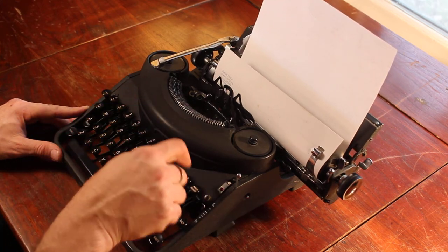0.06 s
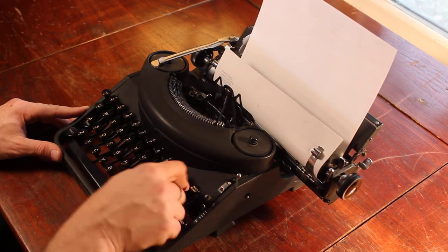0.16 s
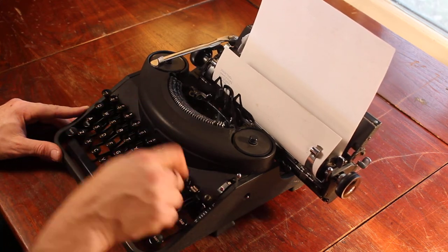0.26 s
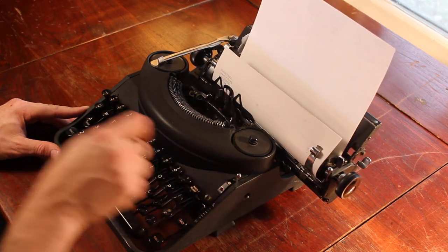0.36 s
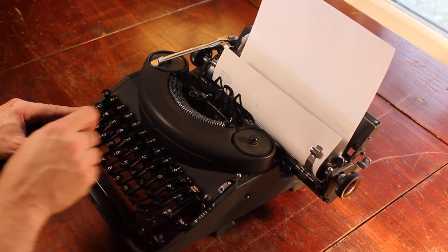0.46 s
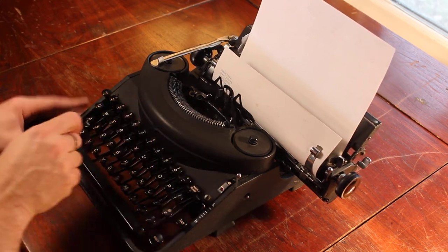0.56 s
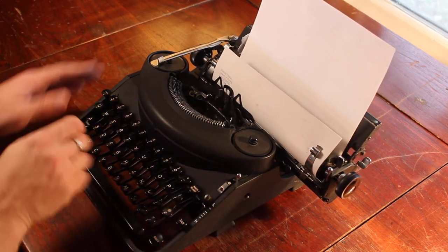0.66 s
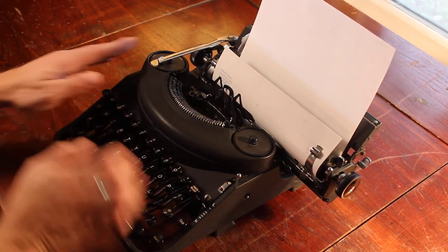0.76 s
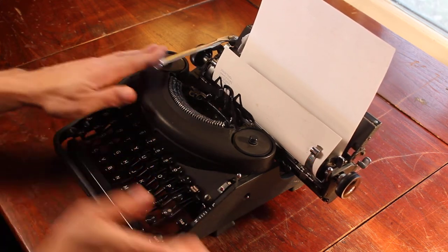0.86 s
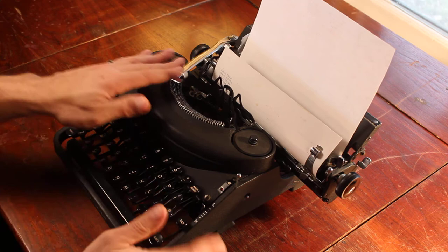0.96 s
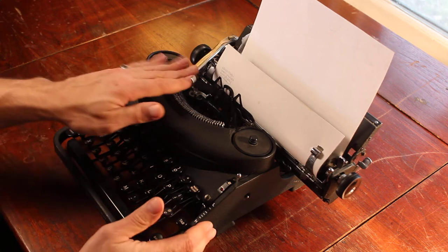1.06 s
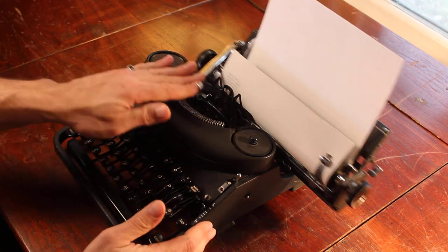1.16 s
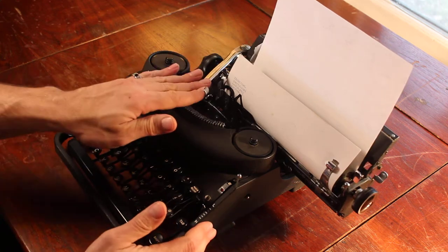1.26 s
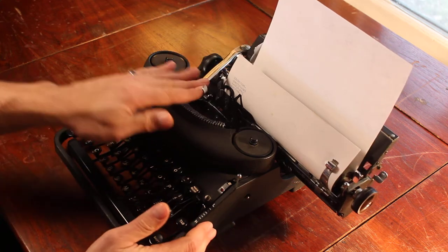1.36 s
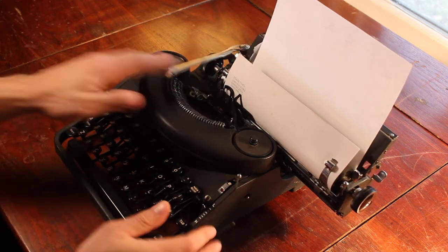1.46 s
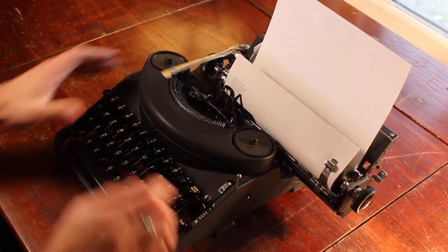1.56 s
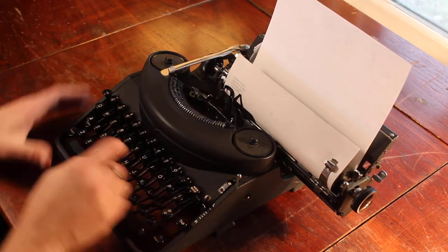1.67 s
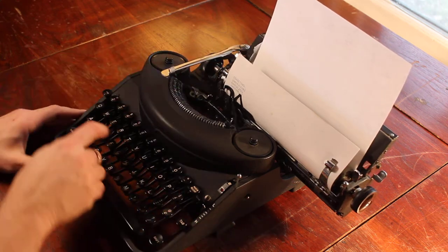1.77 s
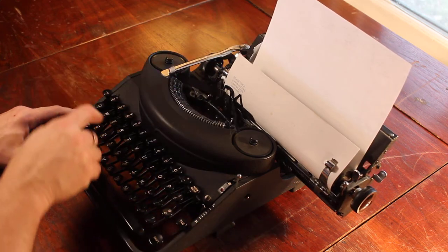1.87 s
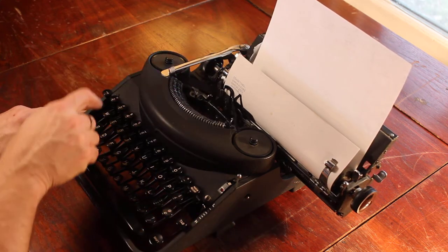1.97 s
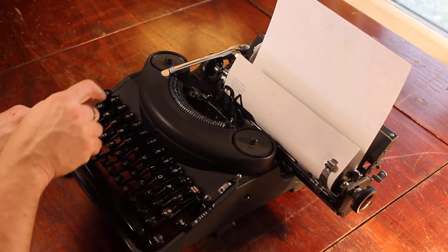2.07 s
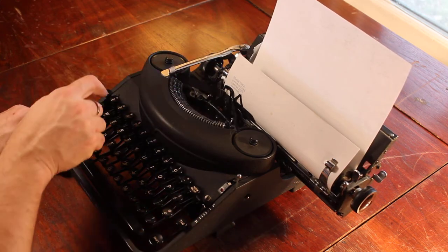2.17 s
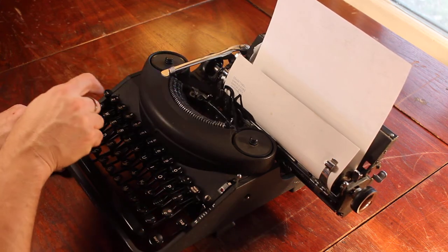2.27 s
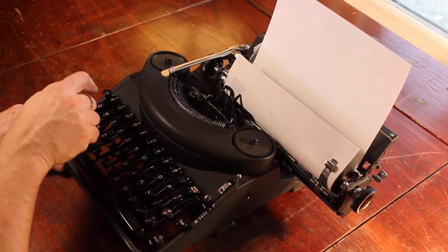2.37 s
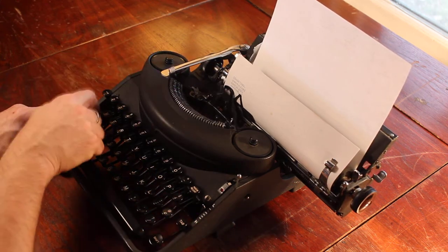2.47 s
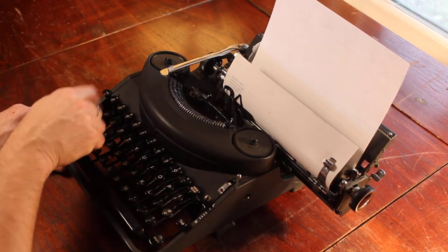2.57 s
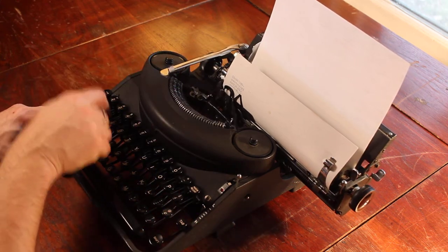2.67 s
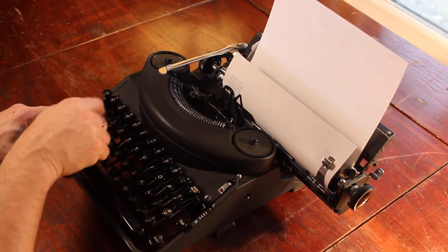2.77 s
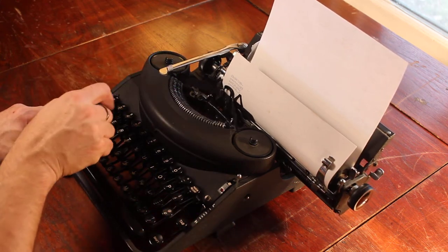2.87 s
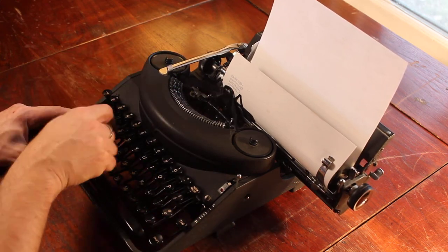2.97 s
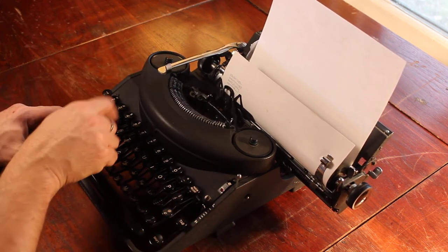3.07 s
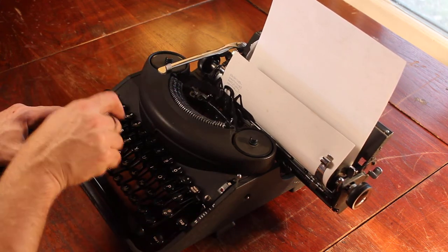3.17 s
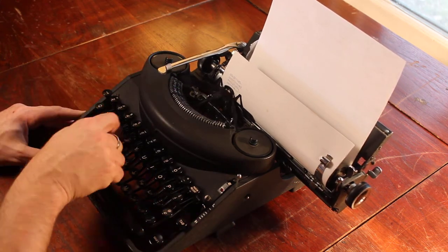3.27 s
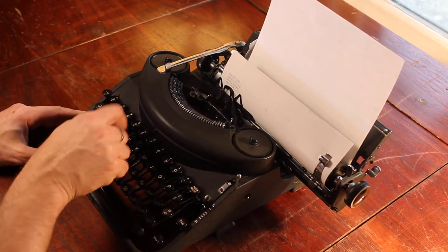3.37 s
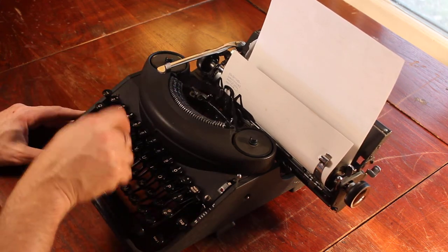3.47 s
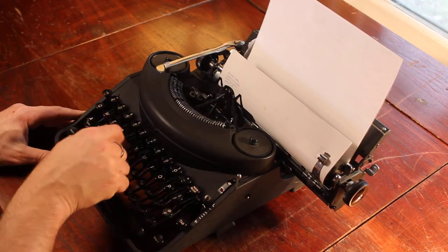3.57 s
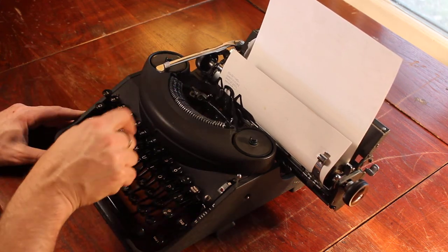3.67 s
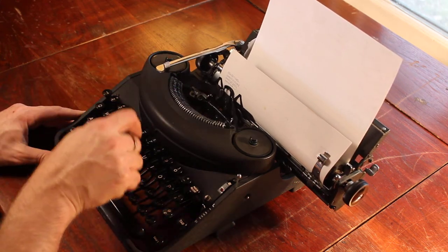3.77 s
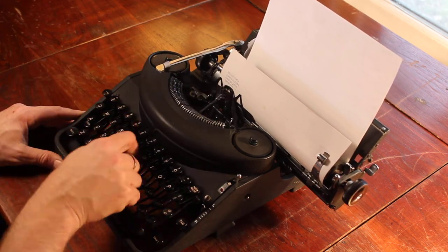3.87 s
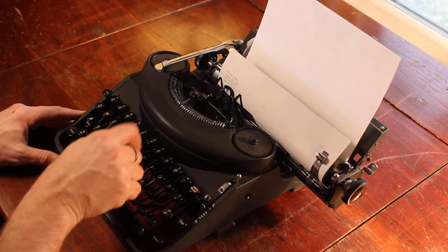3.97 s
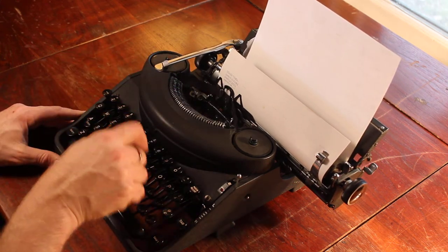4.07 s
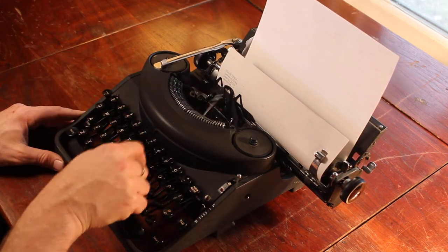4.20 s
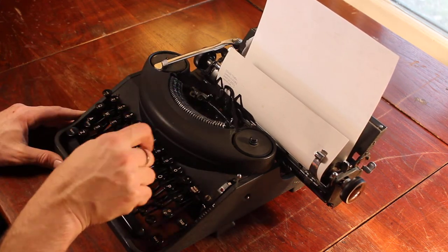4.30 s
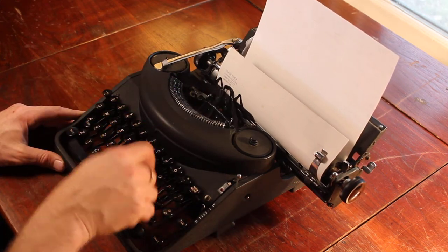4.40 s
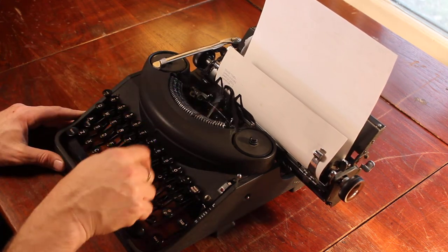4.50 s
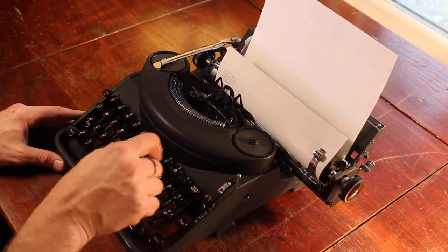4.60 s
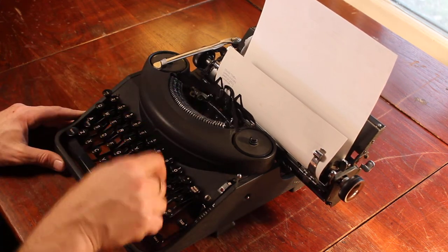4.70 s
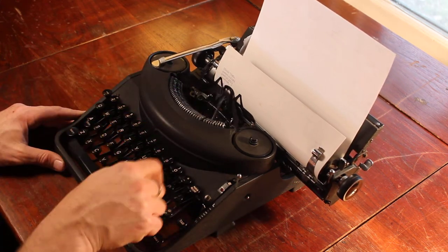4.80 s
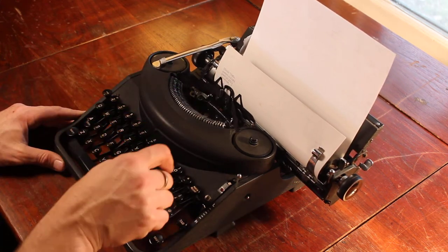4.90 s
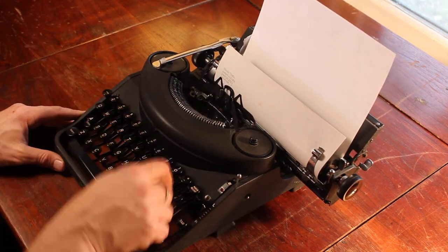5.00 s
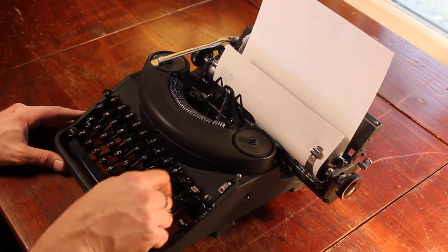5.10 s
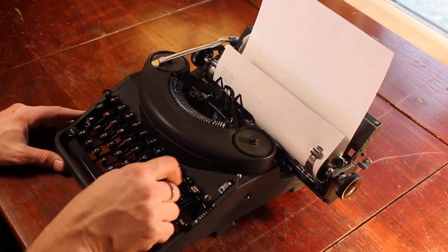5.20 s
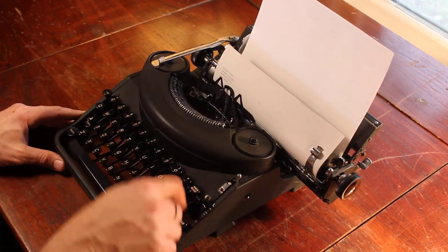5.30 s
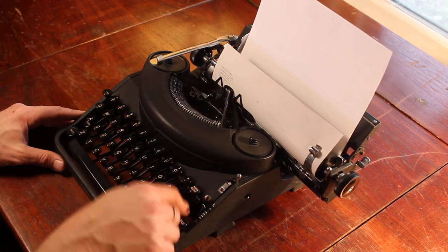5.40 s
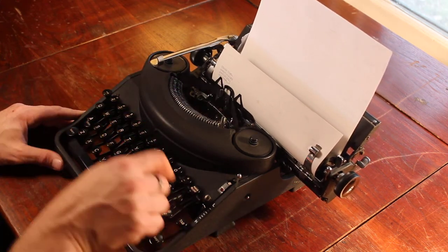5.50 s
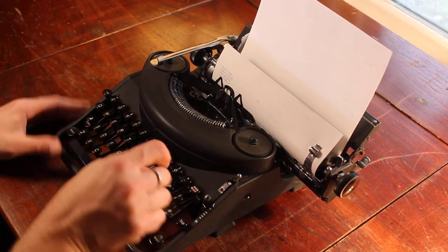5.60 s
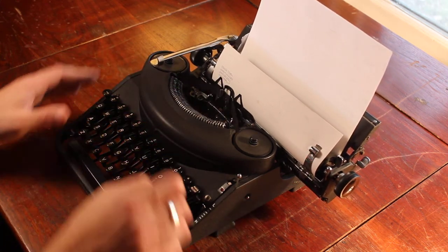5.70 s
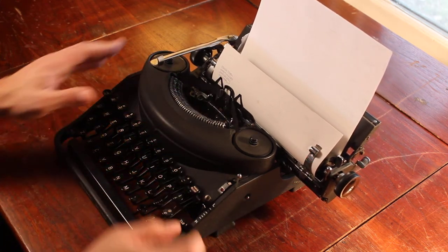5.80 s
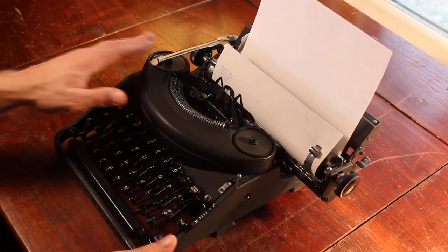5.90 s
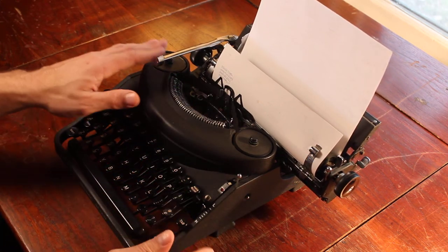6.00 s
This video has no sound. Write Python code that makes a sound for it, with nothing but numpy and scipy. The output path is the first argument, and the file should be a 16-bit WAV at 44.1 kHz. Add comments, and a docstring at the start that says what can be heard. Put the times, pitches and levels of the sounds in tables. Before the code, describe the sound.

Close up, an old manual typewriter clacks once, its carriage zips back to a heavy stop, and slow, even typing follows on a wooden table.

```python
"""In a quiet room, a portable manual typewriter stands on a wooden table, close to a mono microphone.
In each stroke the finger meets the key, the linkage scrapes, the typebar slaps the platen, then parts fall back.
Once the carriage is pushed home over its rack and the lever rattles back. A mains appliance hums far off.
Short noise bursts make the clatter, brief sines the pings, and resonances the ringing frame and table."""
import sys
import numpy as np
from scipy import signal
from scipy.fft import rfft, irfft, next_fast_len
from scipy.io import wavfile
from scipy.ndimage import map_coordinates

SR = 44100
rng = np.random.default_rng(int(sys.argv[2]) if len(sys.argv) > 2 else 0)


def bounce(signal):
    """Save signal as a 16-bit WAV file at the path given by the first command-line argument."""
    frames = np.transpose(np.atleast_2d(signal))
    limited = np.clip(frames, -1, 1)
    pcm = np.round(limited * 32767).astype(np.int16)
    wavfile.write(sys.argv[1], SR, pcm)


N = 266805

# In all tables, t60 is the time a sound takes to fall by 60 dB.
# colour of the room air: (frequency [Hz], relative level [dB])
AIR_COLOUR = [(20, -4.5), (32, -5), (45, -4.5), (65, -10), (90, -14), (200, -15.5), (330, -19.5),
              (430, -27), (600, -31), (1400, -32), (2130, -42.5), (4160, -43), (5000, -47.5), (15900, -51)]
# lines of the distant hum: (frequency [Hz], mean rms level [dB])
HUM_LINES = [(59.6, -57.5), (119.2, -68), (210, -72), (538, -85), (1017, -85), (1378, -86), (1863, -93),
             (3025, -93), (4258, -89)]
# how long the room rings: (frequency [Hz], t60 [s])
ROOM_DECAY = [(150, 0.96), (1000, 0.33), (5000, .28), (14000, 0.32)]
# carriage creeping or sliding on its rails, one list per move: (time [s], scrape level [dB], rumble level [dB])
CARRIAGE_SLIDES = [
    [(0.42, -67, -57), (0.55, -68.5, -60), (0.668, -66, -57), (0.82, -84.5, -74)],
    [(0.86, -80, -70), (0.946, -68, -59.5), (1.04, -61, -52), (1.082, -46.5, -44), (1.138, -50, -46),
     (1.222, -44, -41.5), (1.3, -56, -53)],
    [(1.38, -65.5, -44.5), (1.462, -53.5, -47), (1.558, -52.5, -42.5), (1.724, -66, -52.5),
     (1.85, -76.5, -70)],
    [(5.6, -70, -60), (5.642, -74.5, -66), (5.75, -86, -71)],
]
# noise colour of lever and carriage: (frequency [Hz], relative level [dB])
CHROME_COLOUR = [(180, -32), (300, -5), (453, -13.5), (508, -3), (570, -8), (1140, -6), (1610, -12),
                 (2200, -3), (2820, -10), (4550, -5), (6220, -14.5), (7840, -17.5), (8940, -26),
                 (15400, -33)]
# noise colour of the pawl on the rack: (frequency [Hz], relative level [dB])
PAWL_COLOUR = [(1200, -25.5), (2300, -3), (3200, -11), (4500, 0.5), (6000, -9.5), (8800, -5),
               (10000, -11.5), (13000, -10), (15900, -14)]
# noise colour of the faint ticks: (frequency [Hz], relative level [dB])
TINKLE_COLOUR = [(1200, -36), (2300, -0.5), (3200, -14), (4200, -0.5), (5500, -16.5), (6500, -2),
                 (7400, -12), (8600, -1), (9800, -19), (13500, -16), (15900, -19)]
# noise colour of the key parts: (frequency [Hz], relative level [dB])
STEEL_COLOUR = [(180, -31), (300, -5), (366, -6.5), (397, -9), (431, -8), (651, -6.5), (890, -10),
                (1410, -10.5), (1610, -11), (2200, -7.5), (3610, -12.5), (4550, -8), (5280, -13.5),
                (7000, -16), (8800, -16), (10500, -23), (15400, -24.5)]
# resonances of the steel frame: (frequency [Hz], width [Hz], level [dB])
FRAME_MODES = [(611, 60, -4), (1120, 20, -18), (1387, 136, -2.5), (1910, 27, -16.5), (2130, 32, -15),
               (2840, 27, -22.5), (2940, 110, -9), (4165, 45, 0.5), (4240, 23, -6), (5024, 68, -3),
               (7070, 80, -19.5), (7420, 110, 2.5)]
# frame on table top, closely spaced modes that beat: (frequency [Hz], width [Hz], level [dB])
TABLE_MODES = [(83.2, 30, -19), (116, 8.2, -2.5), (144.2, 9.1, 3), (179, 8, -1), (208.8, 7.2, -8),
               (238.8, 16, -10.5), (245, 10, -24.5), (279, 7.3, -18), (322, 11, -16), (398, 9.9, -12),
               (498, 14, -18.5)]
# low modes of the heavy carriage: (frequency [Hz], relative level [dB], t60 [s])
CARRIAGE_MODES = [(265.6, 7.5, 0.086), (319, -5.5, 0.2), (391, -3.5, 0.21), (498, -7.5, 0.18),
                  (570, -7.5, 0.16), (646.6, -7.5, 0.16), (853, -11, 0.084)]
# single faint ticks: (time [s], level [dB])
FAINT_TICKS = [(0.0674, -45), (0.6274, -63), (0.6436, -60), (4.1044, -50), (4.6696, -52), (4.9629, -49),
               (4.998, -49.5), (5.0213, -46.5), (5.033, -53.5), (5.6064, -52.5), (5.6368, -60),
               (5.6704, -61), (5.9104, -65), (5.9204, -60.5)]
# a spring shivering against its neighbour: (start [s], length [s], first tick level [dB])
SPRING_SHIVERS = [(0.105, 0.036, -46.5), (0.3685, 0.206, -48), (3.197, 0.036, -55.5)]
# carriage lands on the margin stop: (time [s], level [dB])
MARGIN_BLOWS = [(1.257, -13.5)]
# return lever and line feed: (time [s], level [dB], relative treble [dB], ping frequency [Hz])
LEVER_CONTACTS = [(0.894, -40, -15.5, 2450), (0.8998, -34.5, -23, 5000), (0.9962, -23, -10.5, 4300),
                  (1.0554, -39.5, -12.5, 2620), (1.0879, -18, -15.5, 4470), (1.099, -23.5, -20.5, 4100),
                  (1.121, -33.5, -16.5, 4680), (1.2659, -22, -10.5, 4740), (1.2782, -27, -15, 4300),
                  (1.4245, -33, -22, 4630), (1.4339, -32.5, -19.5, 4500), (1.447, -36, -17, 4200),
                  (1.457, -26, -11.5, 4350), (1.4998, -30, -9.5, 4150), (1.506, -24, -12.5, 4620),
                  (1.5204, -34, -13, 4140), (1.546, -33, -13.5, 4400), (1.5646, -28, -13, 4320),
                  (1.5792, -37, -18.5, 4730), (1.6004, -38.5, -20, 4150), (1.6222, -37, -11.5, 2450),
                  (1.6383, -36.5, -25.5, 4540), (1.6882, -38, -14, 4570), (1.729, -47.5, -18, 4750),
                  (1.7535, -58, -22, 2120)]
# loose parts knocking once more: (time [s], level [dB], ping frequency [Hz])
LOOSE_KNOCKS = [(0.0742, -33.5, 2190), (0.3609, -39, 3950), (0.3859, -31, 1840), (0.417, -33, 2070),
                (4.046, -44, 3900), (4.0751, -33, 3170), (4.6325, -33, 1850), (5.2624, -29.5, 1710),
                (5.288, -41.5, 3200), (5.4047, -19.5, 2190), (5.568, -34.5, 2120), (5.582, -36.5, 2140)]
# key let go: (typebar landing time [s], level [dB], relative thud [dB],
# escapement ahead by [ms], key tops out behind by [ms])
KEY_RELEASES = [(0.0034, -22, -2, 14, 24.3), (0.2859, -21, -1, 23.2, 13.3),
                (2.6151, -19.5, -3.5, 58.4, 19.4), (2.8403, -23, -1, 31.7, 10),
                (3.0999, -21.5, 0.5, 22, 18), (3.389, -22, -1.5, 21.6, 18.9),
                (3.6713, -21, -0.5, 19.1, 29.6), (3.988, -22, -5, 24, 16.3),
                (4.2779, -20.5, -2.5, 22.2, 20.1), (4.567, -22.5, -2, 19.6, 20.6),
                (4.877, -20.5, -3, 25.7, 13), (5.182, -22.5, -3, 27.3, 14), (5.4824, -21, -8, 19.6, 21)]
# one keystroke: (slap time [s], slap level [dB], relative thud [dB], typebar ping frequency [Hz],
# relative ping [dB], flight from finger to slap [ms], finger level [dB], key ping frequency [Hz])
KEYSTROKES = [(0.189, -7.5, -8, 5520, -13.5, 28.8, -27, 1970),
              (2.5105, -7.5, -5, 5020, -14, 28.9, -31, 4310),
              (2.7423, -10, -5.5, 5250, -3, 34.4, -30.5, 1730),
              (3.0056, -7, -6.5, 4970, -5.5, 29.6, -28, 3060),
              (3.2952, -6.5, -4.5, 4940, -6, 31.2, -25, 4300),
              (3.5616, -6.5, -9.5, 5500, -4, 30.9, -31, 4530),
              (3.8925, -7, -8, 5080, -1.5, 29.7, -28.5, 4430),
              (4.1766, -7, -6, 5020, -3.5, 29.1, -27, 1770),
              (4.4669, -6.5, -6.5, 5090, -9.5, 32.6, -30, 3260),
              (4.7743, -8, -3.5, 5220, -7, 30.2, -27.5, 3060),
              (5.0828, -8.5, -6, 5050, -13.5, 32.4, -27.5, 3130),
              (5.3675, -10, -5, 5250, -14.5, 29.7, -27, 3120)]

# kinds of contact: (relative thud [dB], relative treble [dB], rattle t60 [s])
FINGER, LOOSE, MARGIN = (6.1, -14, 0.11), (-3.5, -25.5, 0.065), (3.7, -13.5, 0.12)
# slap: (relative treble [dB], rattle t60 [s])
SLAP = (-20, 0.13)
# contacts of a release: (level over the landing [dB], relative treble [dB], rattle t60 [s], ping [Hz])
ESCAPEMENT, LANDING = (-4.5, -9, 0.0683, 4749.5), (0, -15.5, 0.1216, 4151)
KEY_UP = (-3.5, -24.5, 0.0785, 3200.5)
LEVER_THUD_DB, LEVER_T60_S = -14, 0.077
STOP_PING_HZ, STOP_BODY_DB, STOP_BODY_LAG_S = 4780, -9, 0.002
SPRING_PERIOD_S = 0.01425
SPRING_OFFBEAT_DB, SPRING_FADE_DB_PER_S = -8, 32  # every second touch is weaker
RACK_START_S, RACK_TEETH = 1.15, 9
TOOTH_GAP_S, GAP_SHRINK = 0.0142, 0.955  # first gap, and each gap as a share of the one before
TOOTH_DB, TOOTH_RISE_DB = -36, 0.12
TICK_T60_S, TOOTH_T60_S = 0.02, 0.036
AIR_DB = -57.5
TOP_HZ = 15850


def amp(db):
    """Turns decibels into a gain."""
    return 10 ** (np.asarray(db) / 20)


def unit(x):
    """Scales a sound to rms 1."""
    return x / np.sqrt(np.mean(x ** 2) + 1e-20)


def along(points, hz):
    """Reads between (frequency, value) points on a log frequency axis."""
    f, value = np.transpose(points)
    return np.interp(np.log(hz + 1), np.log(f + 1), value)


def filtered(x, response):
    """Multiplies the spectrum of x by a response to frequency."""
    size = next_fast_len(x.shape[-1] + SR // 2)
    spectrum = rfft(x, size) * response(np.fft.rfftfreq(size, 1 / SR))
    return irfft(spectrum, size)[..., :x.shape[-1]]


def noise(colour):
    """Makes coloured noise of rms 1."""
    return unit(filtered(rng.standard_normal(N), lambda hz: amp(along(colour, hz))))


def wobble(rate):
    """Draws a smooth random curve with this many random points a second."""
    points = rng.standard_normal(int(N * rate / SR) + 4)
    return map_coordinates(points, [np.arange(N) * rate / SR])


def add(track, s, piece):
    """Mixes a piece into a track at time s, cutting off what lies outside."""
    i = round(s * SR)
    piece, i = piece[max(-i, 0):], max(i, 0)
    track[i:i + len(piece)] += piece[:len(track) - i]


def fade(t60, rise):
    """Loudness curve of one contact: a quick rise, then an even fall in decibels."""
    t = np.arange(SR // 3) / SR
    return amp(-60 * t / max(t60, 0.002)) * (1 - np.exp(-t / max(rise, 1e-4)))


def background():
    """Room air is coloured noise; the far appliance is a set of slightly unsteady hum lines."""
    t = np.arange(N) / SR
    hum = np.zeros(N)
    for hz, db in HUM_LINES:
        level = amp(db + 3 + 1.2 * wobble(10))  # a sine peaks 3 dB above its rms
        hum += level * np.sin(2 * np.pi * hz * t + 0.4 * wobble(6))
    return amp(AIR_DB) * noise(AIR_COLOUR) + hum


def room(x):
    """Walls answer with a noise-like tail in which each frequency dies at its own speed."""
    hz, t, z = signal.stft(rng.standard_normal(SR // 2), SR, nperseg=256)
    dying = z * amp(-60 * t / along(ROOM_DECAY, hz)[:, None])
    tail = signal.istft(dying, SR, nperseg=256)[1]
    late = np.pad(x, (300, 0))  # the answer starts 300 samples, about 7 ms, later
    return signal.fftconvolve(late, tail / np.linalg.norm(tail))[:N]


def resonance(f, centre, width):
    """One mode answers most strongly at its centre; a narrow width rings longer."""
    return width / (centre * centre - f * f + 1j * f * width)


def table(force):
    """The low modes are all pushed the same way, so they drift apart and meet again."""
    def wood(f):
        return sum(amp(db) * centre * resonance(f, centre, width) for centre, width, db in TABLE_MODES)

    def radiate(f):  # the slowest motion makes little sound
        return (1j * f / (1j * f + 70)) ** 3

    return filtered(force, lambda f: wood(f) * radiate(f))


def frame(x):
    """The steel frame rings in its own modes, with every second one flipped in sign."""
    def body(f):
        return sum((-1) ** k * amp(db) * 1j * f * resonance(f, centre, width)
                   for k, (centre, width, db) in enumerate(FRAME_MODES))

    return filtered(x, body)


def carriage():
    """Rollers scrape on the rails and shake the table: (metal, wood)."""
    scrape, rumble = np.zeros((2, N))
    t = np.arange(N) / SR
    for rows in CARRIAGE_SLIDES:
        s, scrape_db, rumble_db = np.transpose(rows)
        on = (t > s[0]) & (t < s[-1])
        scrape += on * amp(np.interp(t, s, scrape_db))
        rumble += on * amp(np.interp(t, s, rumble_db))
    metal = scrape * noise(CHROME_COLOUR) * amp(2.8 * wobble(90))
    wood = rumble * unit(table(rng.standard_normal(N)))
    return np.array([metal, wood])


def ticks(rows, colour, t60):
    """Tiny bright metal clicks: coloured noise let through in short bursts."""
    level = np.zeros(N)
    for s, db in rows:
        add(level, s, amp(db) * fade(t60, 0.00027))
    return level * noise(colour)


def spring():
    """A shivering spring gives even trains of ticks, strong and weak in turn, fading."""
    rows = []
    for s, length, db in SPRING_SHIVERS:
        for k, t in enumerate(np.arange(0, length, SPRING_PERIOD_S)):
            rows.append((s + t, db + SPRING_OFFBEAT_DB * (k % 2) - SPRING_FADE_DB_PER_S * t))
    return rows


def rack():
    """As the carriage gathers speed, the pawl skips over teeth ever sooner and a little louder."""
    k = np.arange(RACK_TEETH)
    times = RACK_START_S + TOOTH_GAP_S * (1 - GAP_SHRINK ** k) / (1 - GAP_SHRINK)
    return zip(times, TOOTH_DB + TOOTH_RISE_DB * k)


def margin_stop():
    """Landing on the margin stop, the heavy carriage sounds its own low modes."""
    knock = np.zeros(N)
    t = np.arange(SR // 3) / SR
    for s, db in MARGIN_BLOWS:
        for hz, level_db, t60 in CARRIAGE_MODES:
            level = amp(db + level_db + STOP_BODY_DB) * fade(t60, 0.0019)
            add(knock, s + STOP_BODY_LAG_S, level * np.sin(2 * np.pi * hz * t))
    return knock


def contacts(rows, colour, crack_t60, rattle_db, bright_db, ring_db, ping_db, rise,
             push_s, push_db, judder_db, judder_t60, lead_db):
    """Each contact cracks, pings, shakes loose parts, rings the frame and pushes the table: (metal, thud and ping).

    Rows: (time [s], level [dB], relative thud [dB], relative treble [dB], rattle t60 [s], ping [Hz],
    and optionally relative ping [dB])."""
    mids, highs, ping, push, judder = np.zeros((5, N))
    t = np.arange(SR // 20) / SR
    slack = (t[:SR * 15 // 1000] / 0.015) ** 2  # parts take up their slack for 15 ms first
    for s, db, thud_db, treble_db, t60, hz, *own_ping_db in rows:
        crack, rattle = fade(crack_t60, rise), fade(t60, 0.003)
        add(mids, s, amp(db) * (crack + amp(rattle_db) * rattle))
        add(mids, s - 0.015, amp(db + lead_db) * slack)
        add(highs, s, amp(db + treble_db) * (crack + amp(bright_db) * rattle))
        for ratio, mode_db in [(1, 3.0), (0.88, -4.5), (1.14, -6.5)]:  # the struck part's short modes
            level = amp(db + ping_db + sum(own_ping_db) + mode_db + rng.normal(0, 0.93))
            add(ping, s, level * fade(0.011, 0.00039)[:len(t)] * np.sin(2 * np.pi * ratio * hz * t))
        soft_push = t / push_s * np.exp(1 - t / push_s)  # rubber feet soften the force
        add(push, s, amp(db + thud_db + push_db) * soft_push)
        add(judder, s, amp(db + thud_db + judder_db) * fade(judder_t60, 0.0095))
    chatter = noise(colour) * amp(2.68 * wobble(350))  # many small parts
    low = filtered(chatter, lambda hz: 1 / (1 + (hz / 7500) ** 8))
    metal = mids * unit(low) + highs * unit(chatter - low)
    wood = table(push) + judder * unit(table(rng.standard_normal(N)))
    return np.array([metal + amp(ring_db) * frame(metal + ping), wood + ping])


def lever():
    """The lever's contacts and the carriage's blow on the margin stop, as contact rows."""
    rows = [(s, db, LEVER_THUD_DB, treble_db, LEVER_T60_S, hz) for s, db, treble_db, hz in LEVER_CONTACTS]
    return rows + [(s, db, *MARGIN, STOP_PING_HZ) for s, db in MARGIN_BLOWS]


def releases():
    """The escapement steps, the typebar lands, the key tops out; now and then a loose part knocks again."""
    rows = [(s, db, *LOOSE, hz) for s, db, hz in LOOSE_KNOCKS]
    for s, db, thud_db, ahead_ms, behind_ms in KEY_RELEASES:
        for lag_ms, kind in [(-ahead_ms, ESCAPEMENT), (0, LANDING), (behind_ms, KEY_UP)]:
            over_db, *character = kind
            rows.append((s + lag_ms / 1000, db + over_db, thud_db, *character))
    return rows


def fingers():
    """The finger meets the key one flight time before the slap."""
    return [(s - flight_ms / 1000, db, *FINGER, hz) for s, *_, flight_ms, db, hz in KEYSTROKES]


def typebars():
    """The linkage scrapes in flight, the bar brushes the ribbon, and the key hits bottom: (metal, wood)."""
    scrape, bottom = np.zeros((2, N))
    t = np.arange(SR // 20) / SR
    for s, db, thud_db, *_ in slaps():
        add(scrape, s - 0.018, amp(db - 22.5) * np.sin(np.pi * np.clip(t / 0.024, 0, 1)) ** 0.64)
        add(scrape, s - 0.003, amp(db - 11.5) * fade(0.013, 0.00053))  # the ribbon
        # the key bottoms just after the slap
        add(bottom, s + 0.006, amp(db + thud_db + 12.5) * t / 0.0015 * np.exp(1 - t / 0.0011))
    return np.array([scrape * noise(STEEL_COLOUR) * amp(2.3 * wobble(300)), table(bottom)])


def slaps():
    """The typebar hits the platen, the loudest contact of a stroke."""
    return [(s, db, thud_db, *SLAP, hz, ping_db) for s, db, thud_db, hz, ping_db, *_ in KEYSTROKES]


def scene():
    """Machine, room and background; only the metal sounds feed the room, thuds and pings come mostly straight."""
    keys = contacts(lever(), CHROME_COLOUR, crack_t60=0.0098, rattle_db=-9.5, bright_db=-2.0, ring_db=1.5,
                    ping_db=2.0, rise=0.00095, push_s=0.00075, push_db=10.5, judder_db=-4.5,
                    judder_t60=0.13, lead_db=-21.5)
    keys += contacts(releases(), STEEL_COLOUR, crack_t60=0.01, rattle_db=-8, bright_db=-1.5, ring_db=6.0,
                     ping_db=-4.0, rise=0.0024, push_s=0.0013, push_db=15, judder_db=-5,
                     judder_t60=0.16, lead_db=-18.5)
    keys += contacts(fingers(), STEEL_COLOUR, crack_t60=0.012, rattle_db=-5.5, bright_db=-2.0, ring_db=6.0,
                     ping_db=-5.5, rise=0.00055, push_s=0.002, push_db=9, judder_db=-3.5,
                     judder_t60=0.28, lead_db=-49.5)
    keys += contacts(slaps(), STEEL_COLOUR, crack_t60=0.013, rattle_db=-10, bright_db=0.0, ring_db=1.5,
                     ping_db=9.0, rise=0.0005, push_s=0.00052, push_db=14.5, judder_db=-5.5,
                     judder_t60=0.27, lead_db=-31)
    metal, direct = amp(-2.5) * keys + typebars() + carriage()
    metal = metal + ticks(FAINT_TICKS + spring(), TINKLE_COLOUR, TICK_T60_S)
    metal = metal + ticks(rack(), PAWL_COLOUR, TOOTH_T60_S)
    machine = metal + direct + margin_stop()
    return (machine + amp(-10.5) * room(metal) + background())[None]


def record(dry):
    """The microphone chain keeps nothing above its band limit."""
    return filtered(dry, lambda hz: hz < TOP_HZ)


dry = scene()
out = record(dry)
bounce(out)
```